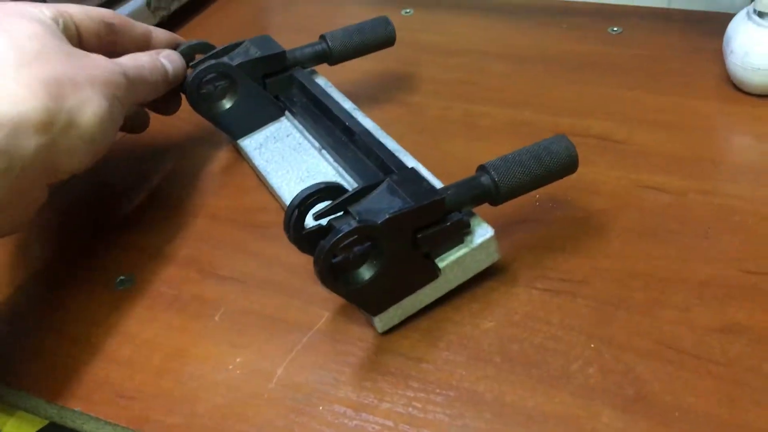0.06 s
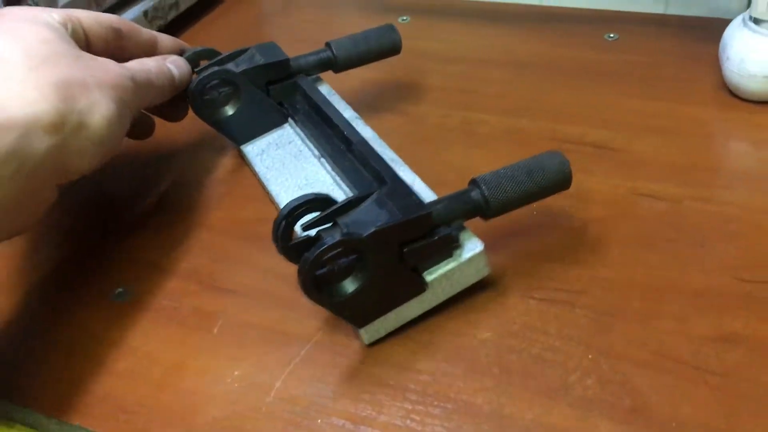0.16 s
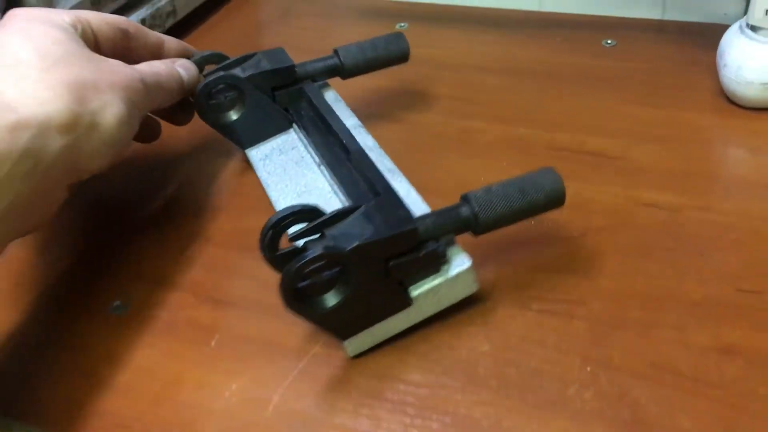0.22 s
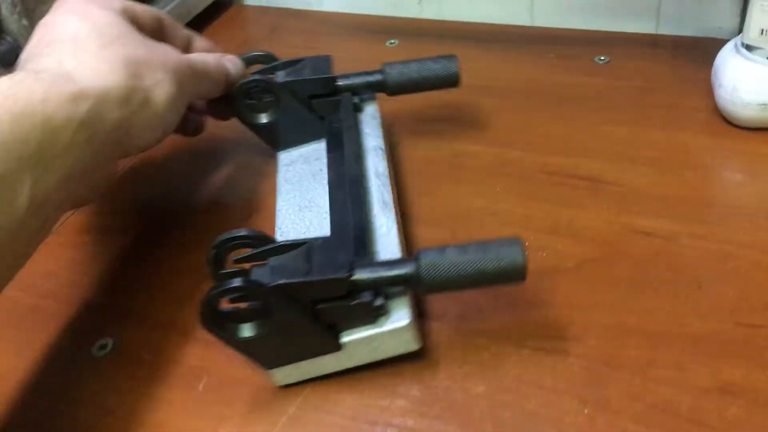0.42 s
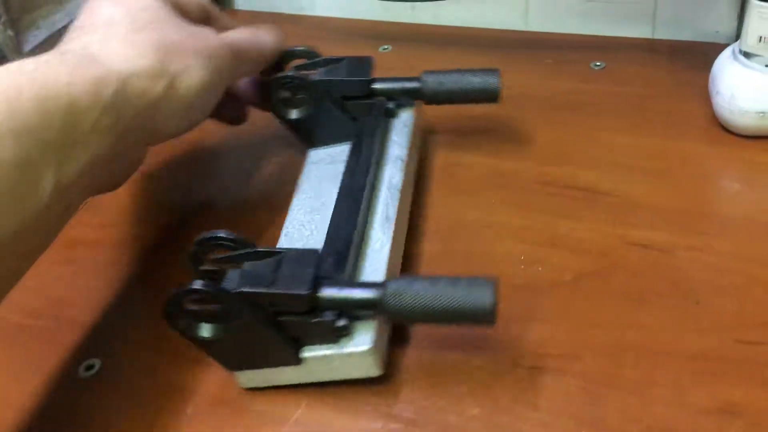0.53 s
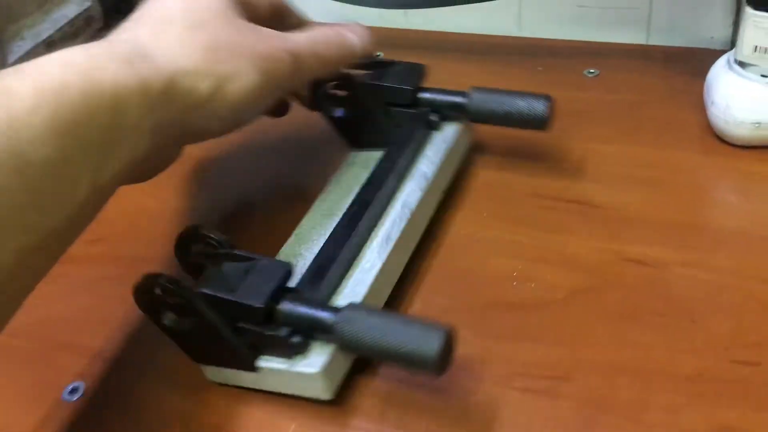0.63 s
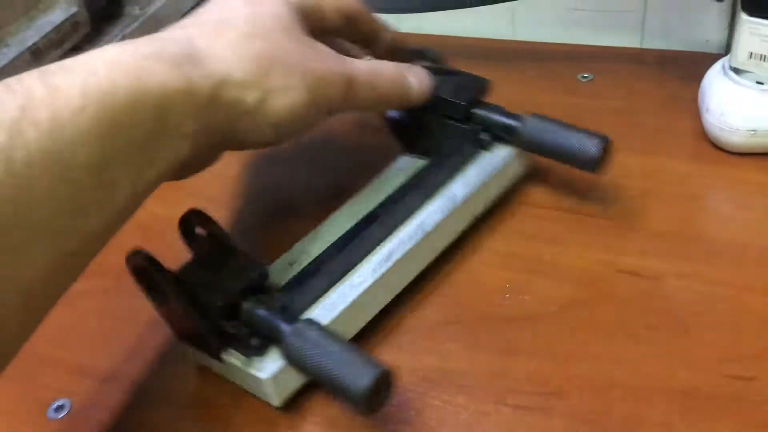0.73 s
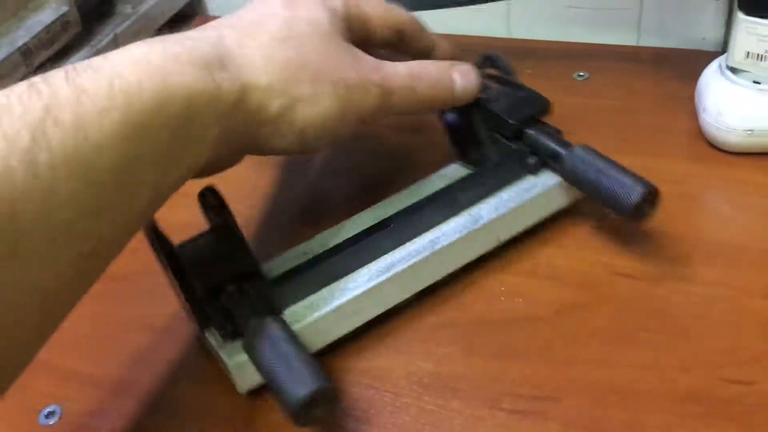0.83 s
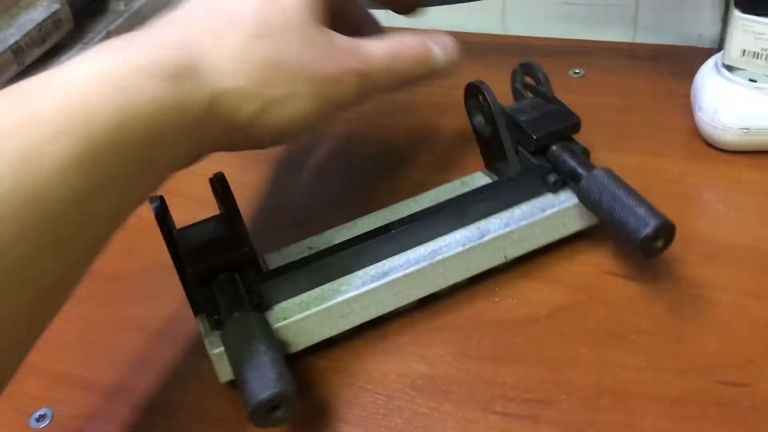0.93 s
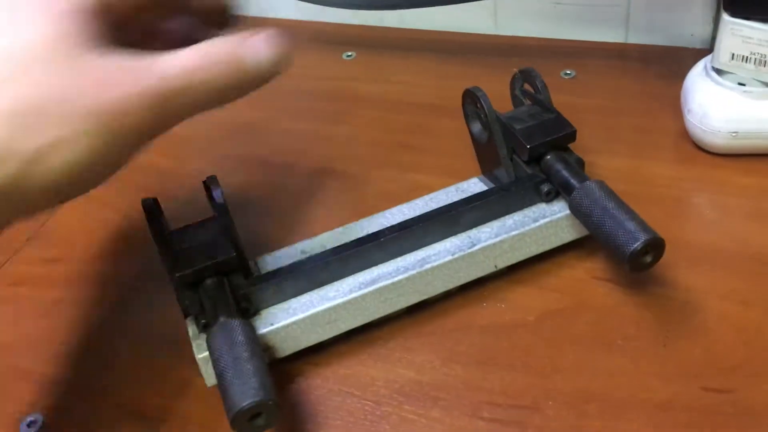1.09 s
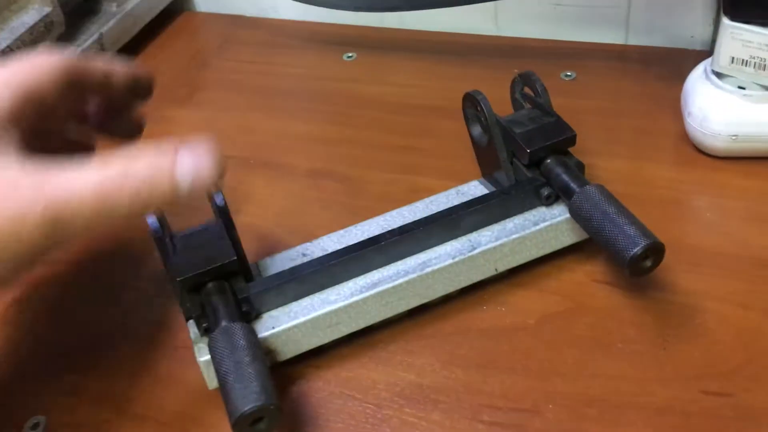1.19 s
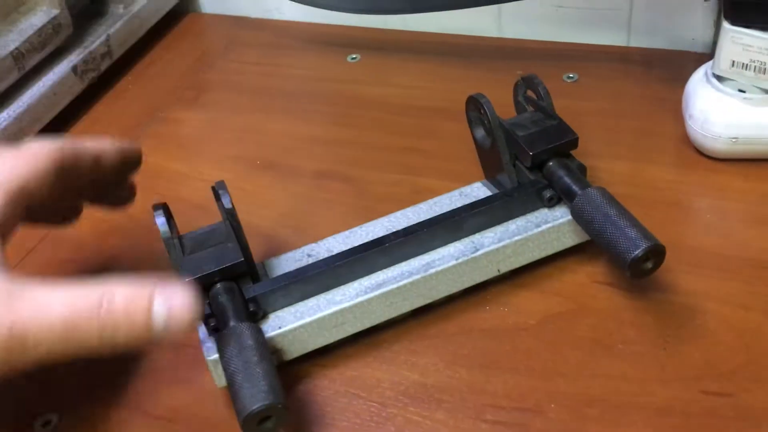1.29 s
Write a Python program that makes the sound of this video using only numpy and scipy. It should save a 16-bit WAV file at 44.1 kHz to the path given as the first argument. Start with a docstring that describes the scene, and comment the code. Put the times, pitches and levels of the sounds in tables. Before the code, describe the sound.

A metal carriage scrapes across a wooden tabletop, starting at about 0.1 seconds and swelling into a gritty rub with a shifting metallic ring. From 0.4 to 0.9 seconds it is loudest, juddering and catching with small thumps, knocks and ticks as the table booms. The slide dies away by 1.1 seconds, followed by a soft rumble of hand movement in a small quiet room.

```python
"""A small quiet room: a metal carriage is pushed and turned across a wooden tabletop in one slide of
about a second. Its base rubs over fine roughness and rings the metal frame, whose resonances shift as
it turns, with gritty hiss on top. It judders against the board, which booms, and catches now and then
with a thump, a knock and a tick. A short echo, soft handling noise and room tone sit behind it."""
import sys
import numpy as np
from scipy import signal
from scipy.fft import rfft, irfft
from scipy.io import wavfile
from scipy.ndimage import uniform_filter1d, map_coordinates

SR = 44100
rng = np.random.default_rng(int(sys.argv[2]) if len(sys.argv) > 2 else 0)


def wrap_up_sound(samples):
    """Save the sound to the file named by the first command line argument, as 16-bit audio."""
    columns = np.atleast_2d(samples).T
    # keep every value between -1 and 1, then stretch to whole-number steps
    tamed = np.clip(columns, -1, 1)
    steps = np.round(tamed * 32767).astype(np.int16)
    wavfile.write(sys.argv[1], SR, steps)


N = 59535

# Table levels are relative; the layers are balanced in the mix.
# swell of the slide: t/s, rub level/dB, grit level/dB
SLIDE_ENVELOPE = [(0.0, -77, -105), (0.09, -74, -73.5), (0.125, -58.5, -68), (0.21, -51.5, -60),
                  (0.26, -45.5, -57.5), (0.385, -46, -53), (0.41, -41.5, -50.5), (0.5, -41, -47.5),
                  (0.56, -38.5, -49), (0.595, -37.5, -44.5), (0.65, -39, -45), (0.695, -43, -43.5),
                  (0.725, -37, -43.5), (0.752, -42.5, -47.5), (0.785, -37, -43), (0.86, -38.5, -47.5),
                  (0.91, -40.5, -50.5), (0.985, -45, -52.5), (1.05, -54, -68), (1.095, -73, -76),
                  (1.15, -74.5, -95)]
# judder of the base against the board: t/s, level/dB
JUDDER_ENVELOPE = [(0.0, -82), (0.1, -67), (0.15, -46), (0.205, -53), (0.228, -45), (0.243, -41.5),
                   (0.275, -38.5), (0.33, -38.5), (0.357, -45), (0.39, -31.5), (0.44, -34), (0.473, -38),
                   (0.51, -32), (0.555, -33.5), (0.585, -35.5), (0.63, -32), (0.655, -45), (0.675, -33),
                   (0.697, -40.5), (0.725, -31), (0.755, -34), (0.777, -33), (0.815, -44), (0.84, -33),
                   (0.86, -38.5), (0.878, -33.5), (0.915, -36.5), (0.955, -43), (0.993, -41.5),
                   (1.03, -45.5), (1.09, -61), (1.15, -72.5)]
# six poses of the turning frame: t/s
FRAME_POSES = [0.32, 0.46, 0.63, 0.745, 0.84, 0.97]
# ring of the frame: f/Hz, width/Hz, then level/dB at each pose
FRAME_MODES = [(680.4, 26, 1, -5, -3.5, 6.5, 4, -0.5), (771.5, 21.4, 4.5, 2.5, 1.5, 5, -1.5, 3.5),
               (1024, 46, 3.5, 5.5, 1, 0, 3, -3), (1106, 39, 1.5, 9, -1.5, 6, -7.5, 0),
               (1212, 39, -18, -8, 0.5, 4, -13, -10), (1408, 46, -21, -5, -1, -16, -10, -10),
               (1506, 46, -2.5, 12, -2, -3, 0, 3), (1580, 76, -4, -2, 4, -11, 11, 0.5),
               (1758, 79, -15, -15, -20, -19, 11, 0), (1880, 73, -3, -4, -1.5, -5, 5.5, 2.5),
               (2056, 95, -3, 1.5, -18, -5.5, -3, -2.5), (2238, 35, -6.5, -1.5, 4, -18, -10, -6),
               (2356, 120, -20, -8, -0.5, -5, -11, -6)]
# high ring of the steel: f/Hz, width/Hz, peak level/dB, peak t/s, half-length of the swell/s
STEEL_MODES = [(2700, 77, 5, 0.85, 0.073), (2940, 72, -1.5, 0.5, 0.1), (3170, 78, 12.5, 0.625, 0.034),
               (3230, 79, 8, 0.654, 0.017), (3660, 230, 4, 0.82, 0.088), (3664, 140, 4, 0.37, 0.11),
               (3982, 51, 7, 0.53, 0.091), (4304, 180, 3, 0.744, 0.032), (4370, 97, 2, 0.526, 0.08),
               (5080, 90, 3, 0.77, 0.029), (5180, 88, 4.5, 0.456, 0.064), (5200, 81, -6, 0.9, 0.14),
               (5940, 200, -7, 0.62, 0.056), (6380, 170, -4, 0.445, 0.1), (6430, 110, -5, 0.817, 0.055),
               (6960, 110, 2, 0.757, 0.026), (7130, 100, -1, 0.9, 0.04), (8650, 690, -15, 0.65, 0.085),
               (11540, 560, -12, 0.83, 0.073)]
# two poses of the carriage on the board: t/s
BOARD_POSES = [0.45, 0.664]
# boom of the tabletop: f/Hz, width/Hz, judder level/dB at each of the two poses, catch level/dB
BOARD_MODES = [(98.1, 14.7, -8.5, -4.5, -10), (176.5, 12.6, 4, 5.5, 1), (236, 27, -2, 3, 4.5),
               (275, 30.5, -4.5, 4.5, 4.5), (360.4, 35.6, -9.5, -9, -5.5), (403.1, 26.6, 0, 2, -3.5),
               (448.8, 52, -4, -10.5, -5.5)]
# the base catching on the wood: t/s, thump level/dB, knock level/dB, tick level/dB
CATCH_HITS = [(0.113, -59, -64, -64), (0.259, -66, -47, -55), (0.398, -41, -53, -52),
              (0.41, -17.5, -29, -42), (0.42, -22.5, -46, -47), (0.431, -35, -36, -49),
              (0.526, -21, -31.5, -38.5), (0.569, -52, -42, -35), (0.597, -25, -36, -46),
              (0.654, -64, -36, -51), (0.714, -34, -34, -48), (0.726, -37.5, -30.5, -37.5),
              (0.769, -22.5, -45, -55), (0.782, -29, -28.5, -44), (0.877, -26, -28.5, -39),
              (0.905, -29.5, -36, -54), (0.914, -37, -33, -43), (0.963, -55, -33, -42.5),
              (1.028, -31.5, -48.5, -54), (1.044, -41.5, -54, -56), (1.055, -41, -46.5, -56)]
# midrange body of the rub: f/Hz, level/dB
RUB_EQ = [(60, -42), (300, -1.5), (560, 4.5), (900, 1.5), (1500, -0.5), (2200, -11), (2900, -20),
          (5000, -26), (16000, -39)]
# bright hiss of the grit: f/Hz, level/dB
GRIT_EQ = [(800, -4), (2500, 1.5), (3700, 1.5), (4450, -4), (4850, -8.5), (5350, -6), (7200, -10),
           (9000, -15.5), (10300, -25), (11800, -30), (15500, -19)]
# hand noise at the start and on letting go: t/s, rumble level/dB, rustle level/dB
HANDLING_ENVELOPE = [(0.0, -38, -64), (0.08, -75, -99), (1.06, -74, -62.5), (1.12, -58.5, -65.5),
                     (1.165, -49, -65), (1.21, -72, -66), (1.35, -67, -65.5)]
# dull rustle of the hands: f/Hz, level/dB
RUSTLE_EQ = [(60, -14), (200, -5), (350, 0), (600, -16.5), (1400, -15.5), (3000, -18.5), (8000, -27),
             (15500, -35)]
# bass-heavy room tone: f/Hz, level/dB
ROOM_EQ = [(15, -16), (25, -4.5), (69, -8.5), (198, -17.5), (253, -50), (340, -15), (457, -29),
           (522, -22.5), (848, -34.5), (1020, -28), (1530, -48), (4150, -48.5), (15500, -53.5)]

RUB_SLIPS_PER_S, GRIT_SLIPS_PER_S, JUDDER_SLIPS_PER_S = 5000, 9000, 260
FRAME_DB, RUB_DB, GRIT_DB, STEEL_DB, BOARD_DB = -1.5, -6.5, -3, 6.5, -1
CHATTER_DB, CHATTER_PER_S = 1.39, 300
BEND_SHARE, BEND_DB, BEND_PER_S = 0.008, 0.5, 22
CATCH_DECAY_S, CATCH_DB, THUMP_DB = 0.0066, -3.5, -4
BOARD_BAND_HZ = (76, 533)
ROOM_T60_S, ECHO_DB, ROOM_DB = 0.14, -9.5, -58
LOW_CUT_HZ, HIGH_CUT_HZ = 28, 15600


def carriage():
    """Chattering friction rings the frame, grit hisses on the steel, coarse slips shake the board."""
    rub_gain, grit_gain = envelopes(SLIDE_ENVELOPE)
    judder_gain, = envelopes(JUDDER_ENVELOPE)
    thump, knock, tick = catches()
    chatter = unit_rms(undb(CHATTER_DB * wander(CHATTER_PER_S)))

    friction = slips(RUB_SLIPS_PER_S, spread_db=3.5) * chatter
    metal = undb(FRAME_DB) * hold_level(frame(friction), span_s=0.022)
    scrape = undb(RUB_DB) * equalise(slips(RUB_SLIPS_PER_S, spread_db=1.5) * chatter, RUB_EQ)
    rubbing = (metal + scrape) * np.hypot(rub_gain, knock)

    bite = chatter * np.hypot(grit_gain, tick)
    hiss = undb(GRIT_DB) * equalise(slips(GRIT_SLIPS_PER_S, spread_db=0.5) * bite, GRIT_EQ)
    sheen = undb(STEEL_DB) * steel(slips(GRIT_SLIPS_PER_S, spread_db=3) * bite)

    judder = slips(JUDDER_SLIPS_PER_S, spread_db=3.5) + 0.5 * friction
    boom = undb(BOARD_DB) * judder_gain * hold_level(board(judder), span_s=0.0294)
    return rubbing + hiss + sheen + boom + thump


def slips(per_s, spread_db):
    """Friction as a crackle of tiny slips, random in timing and uneven in size."""
    hits = rng.random(N) < per_s / SR
    direction = np.sign(rng.standard_normal(N))
    size = undb(spread_db * np.clip(rng.standard_normal(N), -2, 2))
    return unit_rms(hits * direction * size)


def frame(force):
    """The frame's resonances, weighted by which part of the base bears on the wood."""
    t = np.arange(N) / SR
    metal = np.zeros(N)
    for k, (hz, width, *pose_db) in enumerate(FRAME_MODES):
        gain = undb(np.interp(t, FRAME_POSES, pose_db))
        metal += (-1) ** k * gain * waver(ring(force, hz, width))
    return metal


def waver(x):
    """The changing contact bends a resonance a little in pitch and level."""
    position = np.cumsum(1 + BEND_SHARE * wander(BEND_PER_S))
    bent = map_coordinates(x, [position], order=3, mode="mirror")
    return bent * undb(BEND_DB * wander(BEND_PER_S))


def steel(force):
    """High resonances swell and fade as the contact point travels along the base."""
    t = np.arange(N) / SR
    return sum(undb(db) * ring(force, hz, width) / (1 + ((t - at) / span) ** 2)
               for hz, width, db, at, span in STEEL_MODES)


def board(force, struck=False):
    """The tabletop's low modes boom: a shifting blend under the judder, a set one when struck."""
    t = np.arange(N) / SR
    boom = np.zeros(N)
    for k, (hz, width, *pose_db, catch_db) in enumerate(BOARD_MODES):
        db = catch_db if struck else np.interp(t, BOARD_POSES, pose_db)
        boom += (-1) ** k * undb(db) * ring(force, hz, width)
    return signal.sosfilt(signal.butter(3, BOARD_BAND_HZ, "band", fs=SR, output="sos"), boom)


def catches():
    """The base snags: a thump from the board, plus envelopes for the frame's knock and the grit's tick."""
    t = np.arange(N) / SR
    push, knock, tick = np.zeros((3, N))
    for at, thump_db, knock_db, tick_db in CATCH_HITS:
        push[int(at * SR)] += undb(thump_db)
        fade = (t >= at) * np.exp(-np.abs(t - at) / CATCH_DECAY_S)
        knock += undb(knock_db) * fade
        tick += undb(tick_db) * fade
    impulse_peak = np.abs(board(signal.unit_impulse(N), struck=True)).max()
    thump = board(push, struck=True) / impulse_peak
    return undb(THUMP_DB) * thump, undb(CATCH_DB) * knock, undb(CATCH_DB) * tick


def handling():
    """A low rumble and a faint rustle from the moving hands."""
    rumble_gain, rustle_gain = envelopes(HANDLING_ENVELOPE)
    rumble = rng.standard_normal(N)
    for _ in range(2):
        rumble = ring(rumble, hz=41.0, width_hz=7.9)
    rustle = equalise(rng.standard_normal(N), RUSTLE_EQ)
    return rumble_gain * hold_level(rumble, span_s=0.054) + rustle_gain * rustle


def room_echo(x):
    """The small room answers with a dense, fast-dying tail."""
    t = np.arange(N // 4) / SR
    tail = rng.standard_normal(len(t)) * undb(-60 * t / ROOM_T60_S)
    return undb(ECHO_DB) * convolve(x, tail)


def room_tone():
    """A faint, dark bed of steady noise."""
    return undb(ROOM_DB) * equalise(rng.standard_normal(N), ROOM_EQ)


def undb(db):
    """Decibels to gain."""
    return 10 ** (np.asarray(db) / 20)


def unit_rms(x):
    """Scale to rms 1."""
    return x / np.sqrt(np.mean(x ** 2))


def envelopes(table):
    """Gains over time, one for each level column of a table."""
    times, *columns = np.array(table).T
    return [undb(np.interp(np.arange(N) / SR, times, db)) for db in columns]


def convolve(x, response):
    """Play a sound through an impulse response scaled to unit energy."""
    return signal.fftconvolve(x, response / np.linalg.norm(response))[:N]


def equalise(x, points):
    """Minimum-phase EQ through the given points; keeps the power of white noise."""
    size = 8192
    hz, db = np.array(points).T
    f = np.maximum(np.fft.rfftfreq(size, 1 / SR), 1)
    gain = undb(np.interp(np.log(f), np.log(hz), db))
    cepstrum = irfft(np.log(gain))
    cepstrum[1:size // 2] *= 2  # folding onto positive time makes the filter causal
    cepstrum[size // 2 + 1:] = 0
    return convolve(x, irfft(np.exp(rfft(cepstrum))))


def ring(x, hz, width_hz):
    """One resonance, gain 1 at its centre."""
    return signal.lfilter(*signal.iirpeak(hz, hz / width_hz, fs=SR), x)


def wander(per_s):
    """Smooth random drift of rms 1."""
    hold = int(SR / per_s)
    steps = rng.standard_normal(N)[np.arange(N) // hold]
    return unit_rms(uniform_filter1d(steps, hold))


def hold_level(x, span_s):
    """Ride the gain to hold rms 1 over the given span."""
    return x / np.sqrt(uniform_filter1d(x ** 2, int(span_s * SR)) + 1e-12)


def scene():
    """The slide with its short echo, over handling noise and room tone, in mono."""
    slide = carriage()
    bed = room_tone()
    return (slide + room_echo(slide) + handling() + bed)[None]


def record(dry):
    """Trim the deepest bass and the very top."""
    low_cut = signal.butter(4, LOW_CUT_HZ, "high", fs=SR, output="sos")
    high_cut = signal.ellip(10, .2, 70, HIGH_CUT_HZ, fs=SR, output="sos")
    return signal.sosfilt(high_cut, signal.sosfilt(low_cut, dry))


dry = scene()
out = record(dry)
wrap_up_sound(out)
```